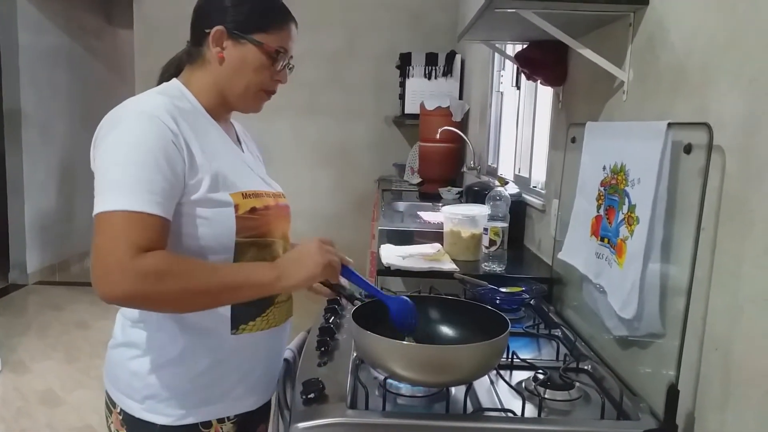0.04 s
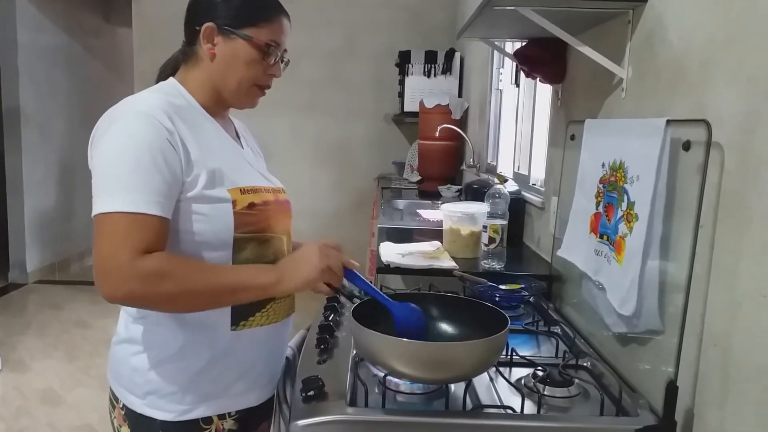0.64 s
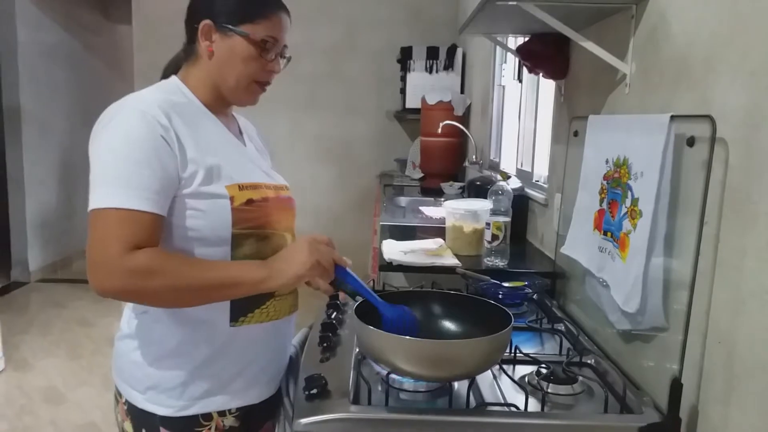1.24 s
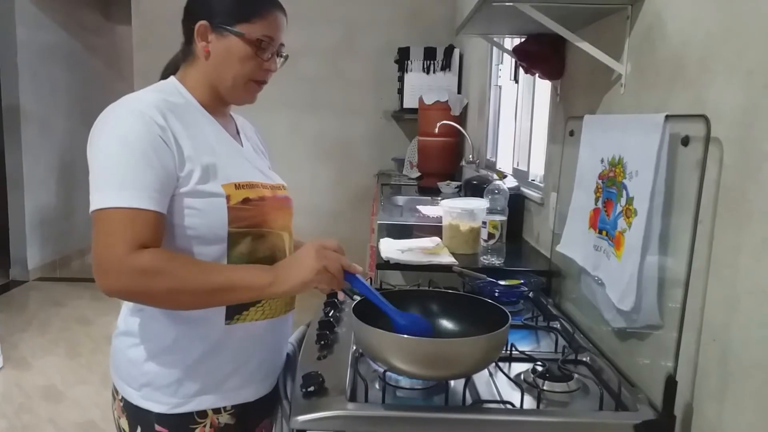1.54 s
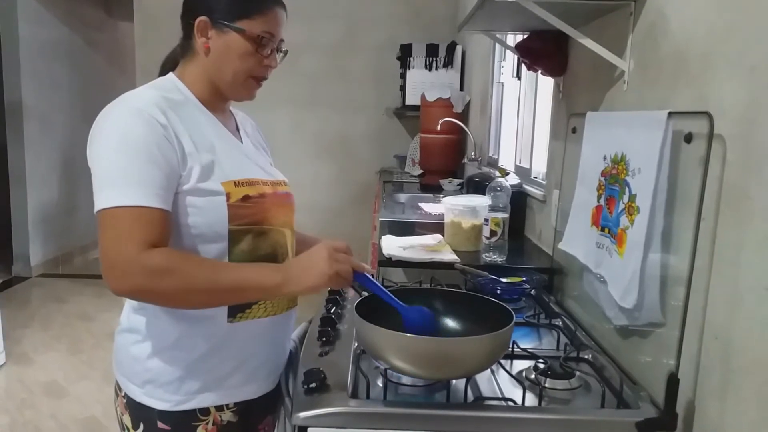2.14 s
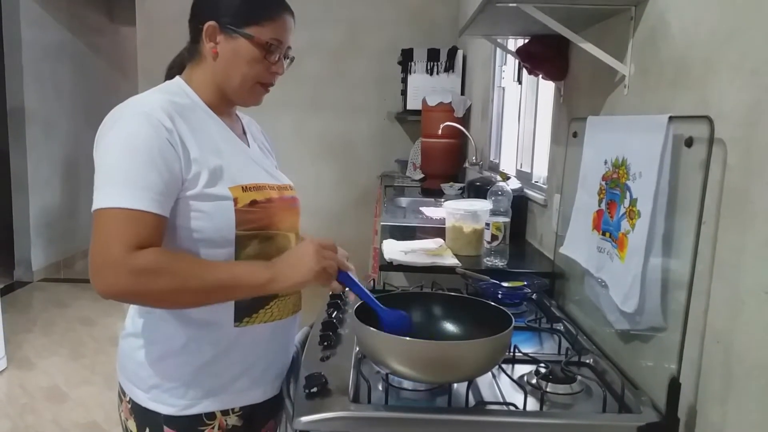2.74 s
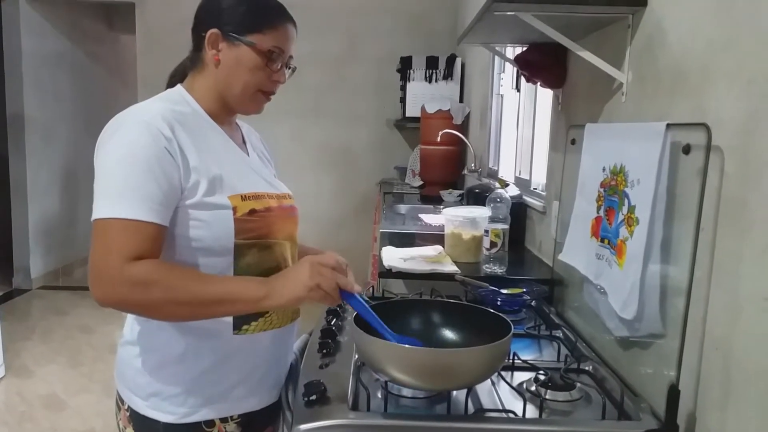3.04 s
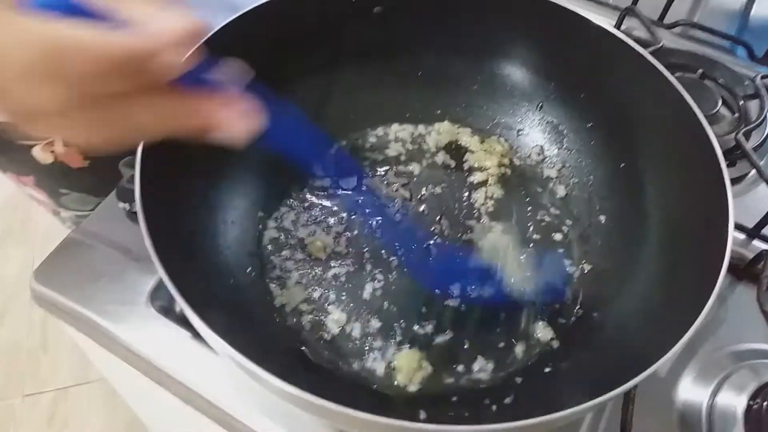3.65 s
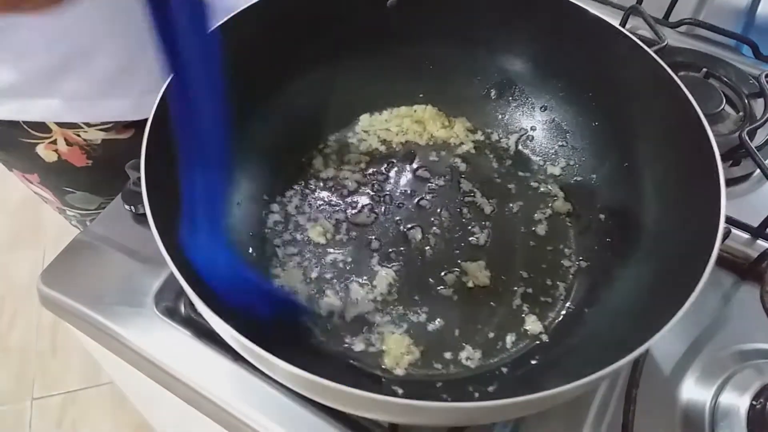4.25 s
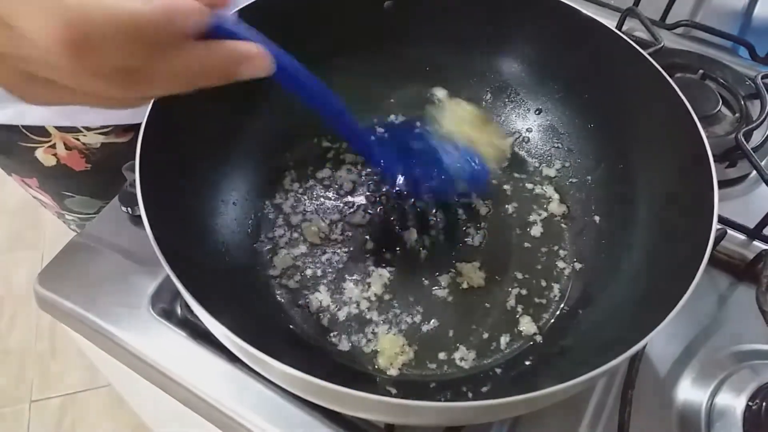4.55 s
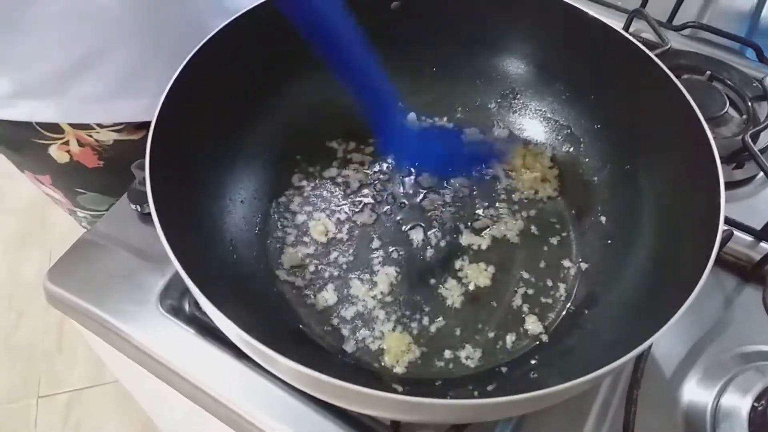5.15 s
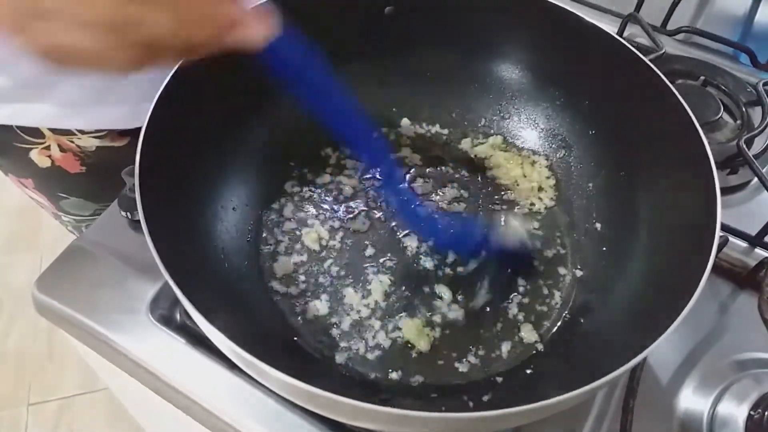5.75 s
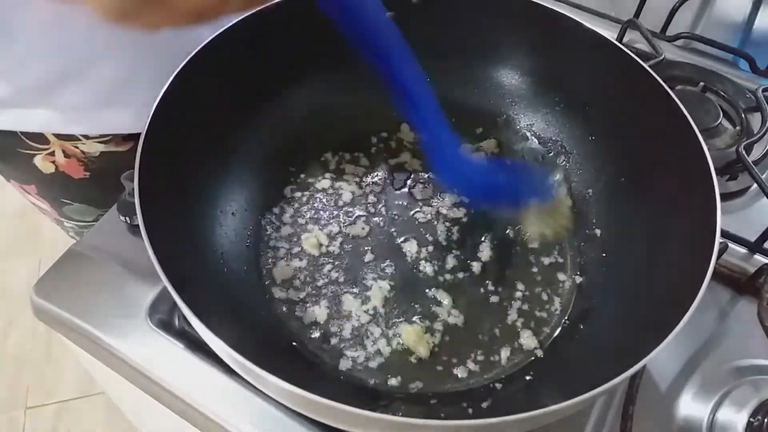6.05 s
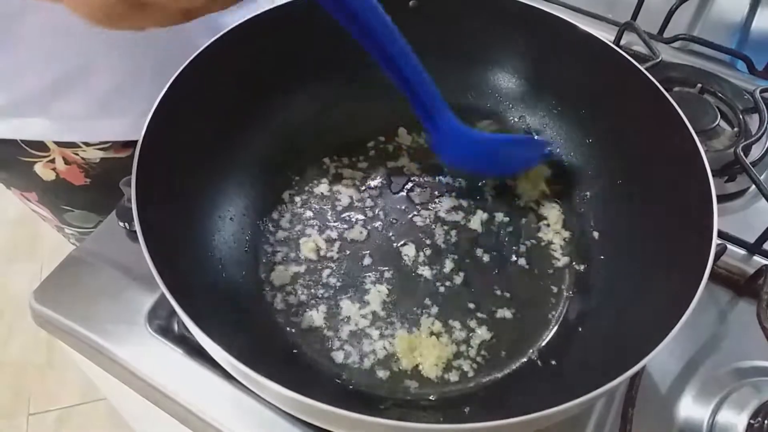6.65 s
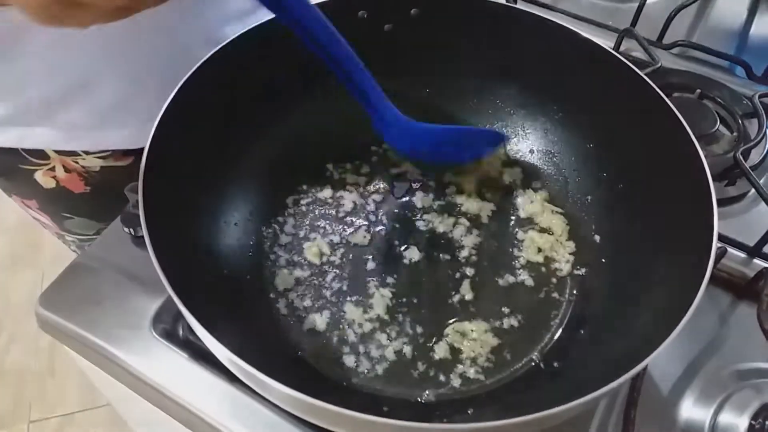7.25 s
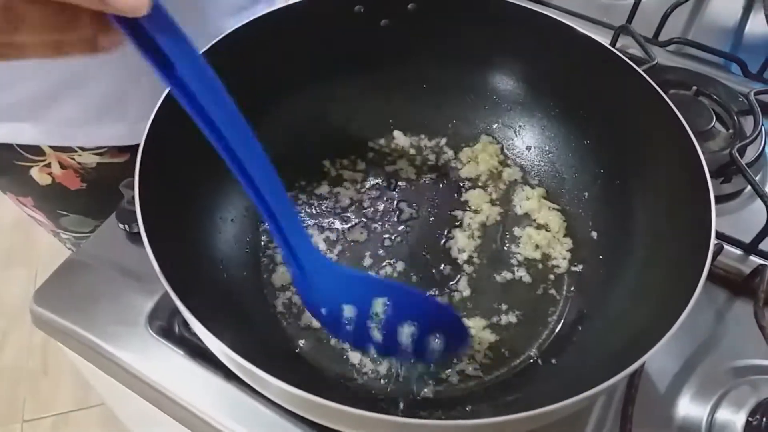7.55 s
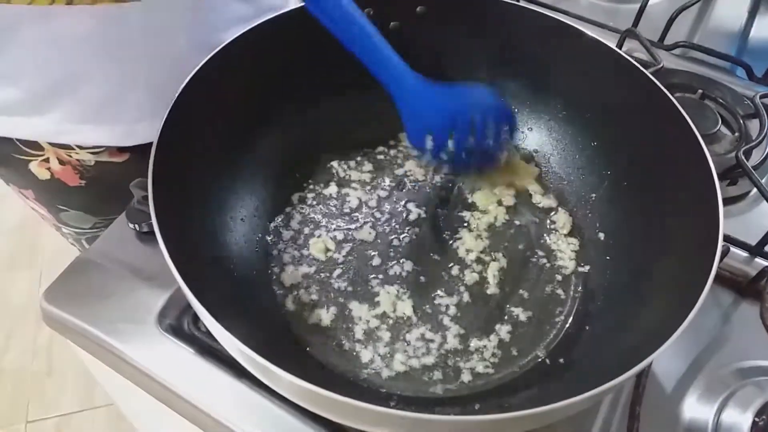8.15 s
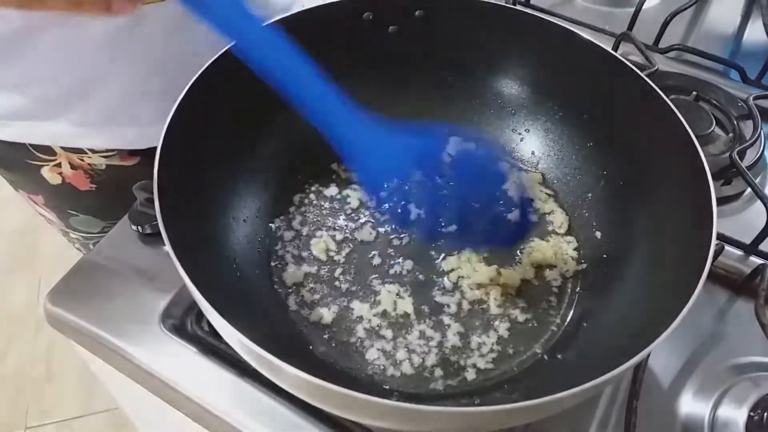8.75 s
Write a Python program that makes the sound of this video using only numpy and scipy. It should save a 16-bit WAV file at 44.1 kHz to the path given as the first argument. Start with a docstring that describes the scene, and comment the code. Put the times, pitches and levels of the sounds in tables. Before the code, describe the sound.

Minced garlic sizzles in oil as a silicone spatula stirs and knocks the pan, faint at first, then close and loud.

```python
"""In a tiled kitchen, minced garlic fries in a wok on a gas stove while a silicone spatula stirs it.
Countless steam bubbles burst in the oil; the burner rumbles and a fridge hums underneath.
Each landing of the blade thuds, drags and clacks the pan on its grate; each sweep rubs and may squeak.
We listen from across the room, then, after a short break, from just above the pan. Mono."""
import sys
import numpy as np
from scipy import signal
from scipy.fft import rfft, irfft
from scipy.io import wavfile

SR = 44100
rng = np.random.default_rng(int(sys.argv[2]) if len(sys.argv) > 2 else 0)


def master(y):
    """Save y as 16-bit WAV."""
    cut = np.clip(np.atleast_2d(y).T, -1, 1)
    pcm = np.round(cut * 32767)  # scale
    wavfile.write(sys.argv[1], SR, pcm.astype(np.int16))


N = 396528
T = np.arange(N) / SR
FILTER_HZ = np.fft.rfftfreq(32768, 1 / SR)
BREAK_START_S, BREAK_END_S = 3.427, 3.4588  # far away before the break, close by after it


def undb(db):
    """Turn decibels into a number to multiply by."""
    return 10 ** (np.asarray(db) / 20)


def unit(x):
    """Scale a sound to an average strength (rms) of 1."""
    return x / np.sqrt(np.mean(x ** 2))


def waver(rate):
    """Drift by about 1 either way, toward a new random value `rate` times a second."""
    targets = rng.standard_normal(N // 8)
    return 1.2 * np.interp(T * rate, np.arange(len(targets)), targets)


def band(x, hz, q):
    """Keep the sound around one pitch; a higher q keeps a narrower band."""
    angle = 2 * np.pi * min(hz, SR / 2 - 1000) / SR
    damping = np.sin(angle) / (2 * q)
    return signal.lfilter([damping, 0, -damping], [1 + damping, -2 * np.cos(angle), 1 - damping], x)


def shape_tone(x, gain):
    """Filter a sound with one gain for each of FILTER_HZ."""
    cepstrum = irfft(np.log(gain))
    half = len(cepstrum) // 2
    # folding it in half makes the filter ring only after a sound, never before
    cepstrum[1:half] *= 2
    cepstrum[half + 1:] = 0
    response = irfft(np.exp(rfft(cepstrum)))[:half]
    return signal.oaconvolve(x, response)[:len(x)]


def colour(x, points):
    """Turn lows and highs up or down along (pitch [Hz], level [dB]) points."""
    hz, db = np.transpose(points)
    return shape_tone(x, undb(np.interp(np.log(FILTER_HZ + 1), np.log(hz), db)))


def add(out, time, x):
    """Mix x in, starting at a time in seconds."""
    start = max(int(time * SR), 0)
    out[start:start + len(x)] += x[:len(out) - start]


def clicks(rate, spread_db):
    """About `rate` random clicks a second: many small, a few large."""
    size = undb(spread_db * np.minimum(rng.standard_normal(N), 2.6))
    return unit((rng.random(N) < rate / SR) * size * rng.choice([-1, 1], N))


def swell(peak, rise, fall):
    """A smooth rise and fall, timed in seconds: gives the samples it covers and its height there."""
    part = slice(max(int((peak - 3.5 * rise) * SR), 0), int((peak + 3.5 * fall) * SR))
    t = T[part] - peak
    return part, np.exp(-(t / np.where(t < 0, rise, fall)) ** 2 / 2)


# tone of the burner: (pitch [Hz], relative level [dB])
BURNER_TONE = [(25, -41), (45, -8), (80, -18), (125, 4), (220, -7.5), (400, -3), (800, -12), (1500, -33),
               (4000, -27.5)]


def burner():
    """The gas flame makes a steady, low rushing noise."""
    return undb(-57) * unit(colour(rng.standard_normal(N), BURNER_TONE))


# tone of the rumble: (pitch [Hz], relative level [dB])
RUMBLE_TONE = [(30, -45), (70, -6), (130, -0.5), (220, 4), (320, 1.5), (450, -11), (800, -10),
               (1500, -24.5), (4000, -28)]
# moments when the rumble swells: (peak time [s], half length [s], level [dB])
RUMBLE_SWELLS = [(1.836, 0.1, -47), (2.377, 0.033, -48.5), (4.247, 0.26, -46.5), (4.332, 0.035, -36),
                 (5.053, 0.078, -50.5), (6.052, .025, -45), (6.418, 0.034, -45)]


def rumble():
    """A dull, uneven rumble that grows louder now and then."""
    power = np.full(N, undb(-54.5) ** 2)
    for time, half_length, db in RUMBLE_SWELLS:
        part, bell = swell(time, half_length, half_length)
        power[part] += (undb(db) * bell) ** 2
    flutter = undb(3.03 * waver(25))
    return np.sqrt(power) * flutter * unit(colour(rng.standard_normal(N), RUMBLE_TONE))


# notes in the fridge's hum: (multiple of the base pitch, level [dB])
FRIDGE_NOTES = [(2, -61), (3, -54.5)]


def fridge(base_hz=59.8):
    """The fridge hums two low notes that waver a little in pitch and loudness."""
    phase = 2 * np.pi * np.cumsum(base_hz * (1 + 0.00279 * waver(3.04))) / SR
    return sum(undb(db + 2.6 * waver(9)) * np.sqrt(2) * np.sin(multiple * phase)
               for multiple, db in FRIDGE_NOTES)


def bubbles(rate, fizz_db, crackle_db):
    """Steam bursts in the oil: sharp snaps, flurries of tiny ringing bubbles, hiss and lone crackles."""
    snaps, pops = clicks(rate, spread_db=4.5), clicks(1.5 * rate, spread_db=4.5)
    pitches = np.geomspace(3000, 15000, 10)
    choice = rng.integers(len(pitches), size=N)  # each pop rings at one of the pitches
    fizz = np.zeros(N)
    for k, hz in enumerate(pitches):
        flurries = undb(2.5 * waver(14))
        fizz += band(pops * (choice == k) * flurries, hz, q=4.9)
    hiss = rng.standard_normal(N)
    crackle = clicks(rate=35, spread_db=4.5)
    bursts = snaps + undb(fizz_db) * unit(fizz) + undb(-5) * hiss + undb(crackle_db) * crackle
    return unit(bursts) * undb(0.43 * waver(30))


# the sizzle flares up: (start time [s], boost [dB])
FLARES = [(3.29, 5), (3.94, 1.5), (4.27, 1.5), (4.44, 0), (5.22, 1), (8.15, 0.5)]


def frying_level(course, rise_s=0.092):
    """The frying's level in dB: it jumps as garlic is spread over hot oil, then sinks back."""
    times, course_db = np.transpose(course)
    level_db = np.interp(T, times, course_db)
    for time, boost_db in FLARES:
        if (time < BREAK_START_S) == (times[0] < BREAK_START_S):  # on the same side of the break
            age = np.maximum(T - time, 0) / rise_s
            level_db += boost_db * age * np.exp(1 - age)
    return level_db


def sizzle(bursts, course, tone, spray_db, spray_follow, spray_lag_s=0.054):
    """The bursts swell with the frying; the finest, highest spray follows a moment later."""
    fry_db = frying_level(course)
    usual_db = np.mean(np.transpose(course)[1])
    late_change_db = np.interp(T - spray_lag_s, T, fry_db) - usual_db
    fine_db = usual_db + spray_db + spray_follow * late_change_db
    sound = colour(bursts, tone)
    coarse = signal.oaconvolve(sound, signal.firwin(61, 9000, fs=SR), "same")  # below 9000 Hz
    return undb(fry_db) * unit(coarse) + undb(fine_db) * unit(sound - coarse)


# how hard the garlic fries, from across the room: (time [s], relative level [dB])
FAR_COURSE = [(0.05, -54.5), (.6, -58.5), (1.2, -53.5), (1.55, -50), (2.15, -49), (2.32, -53.5),
              (2.7, -47.5), (3.2, -50)]
# tone of the distant sizzle: (pitch [Hz], relative level [dB])
FAR_TONE = [(300, -21), (1500, -8.5), (2800, -11), (3700, -11), (4600, -0.5), (5500, 3), (6600, 4),
            (8200, 1), (9200, -14.5), (11500, -11.5), (13500, -14.5), (15800, -13.5)]


def far_frying():
    """The frying begins: fewer bubbles, mixed with their echo off the tiles."""
    bursts = bubbles(rate=3500, fizz_db=4, crackle_db=-11)
    echo = undb(-2) * kitchen_echo(bursts, low_fade_s=0.62, high_fade_s=0.6)
    return sizzle(bursts + echo, FAR_COURSE, FAR_TONE, spray_db=-2.5, spray_follow=0.58)


def kitchen_echo(x, low_fade_s, high_fade_s):
    """Sound bounces off the tiles: a few echoes, then a blur that drops 60 dB in the fade time."""
    t = T[:SR]
    echoes = rng.standard_normal(SR) * (rng.random(SR) < t / 0.03) * (t > 0.003)
    lows = signal.sosfilt(signal.butter(1, 3000, fs=SR, output="sos"), echoes)
    response = lows * undb(-60 * t / low_fade_s) + (echoes - lows) * undb(-60 * t / high_fade_s)
    return signal.oaconvolve(x, response / np.linalg.norm(response))[:N]


# the spatula lands, with levels before the pan shapes them:
# (time [s], thud level [dB], thud pitch [Hz], clack level [dB], drag level [dB])
LANDINGS = [(0.1599, 1, 1350, 4.5, -36.5), (.517, -2, 1870, -3, -33), (.829, -8, 915, -3, -59),
            (1.112, -24, 696, -11.5, -47.5), (2.480, -7.5, 650, -8, -38), (3.071, -5, 960, -12, -37),
            (3.963, -0.5, 2000, -8, -60), (4.445, -8.5, 1090, -35, -65), (4.576, -6.5, 590, -30, -47),
            (4.913, -11, 2600, -6, -49), (6.030, -10.5, 704, -30, -55), (7.058, -7.5, 550, -26, -41),
            (7.482, -9, 710, -17, -61), (7.733, -1, 695, -7, -36), (8.229, -4, 1210, -18, -58)]
# tone of metal hitting the grate: (pitch [Hz], boost [dB])
CLACK_TONE = [(100, -20), (800, 3.5), (3500, 7.5), (5000, 16.5), (6000, 12.5), (8400, 9.5), (9300, 4),
              (11000, 14), (15800, 0)]


def knocks():
    """The soft blade thuds and the pan clacks on its grate; harder clacks are brighter."""
    thuds, clacks, t = np.zeros(N), np.zeros(N), T[:SR // 20]
    for time, thud_db, thud_hz, clack_db, _ in LANDINGS:
        noise = rng.standard_normal(len(t))
        judder = 0.16 * noise[::-1] * np.exp(-t / 0.018)  # the rubber shakes after landing
        thud = band(ring(thud_hz, 2 * thud_hz, t) + judder, thud_hz, q=0.49)
        add(thuds, time, undb(thud_db) * thud / np.linalg.norm(thud))
        chatter = noise * np.exp(-t / 0.0062)
        top_hz = min(6300 * 2 ** (clack_db / 24), SR / 3)
        soften = signal.butter(2, top_hz, fs=SR, output="sos")
        add(clacks, time, undb(clack_db) * signal.sosfilt(soften, chatter / np.linalg.norm(chatter)))
    return thuds + colour(clacks, CLACK_TONE)


def drags(slips, rise_s=0.0054, fall_s=0.058):
    """Just after each landing, the blade drags with a dull rub."""
    return sum(rub(slips, time + 2 * rise_s, rise_s, fall_s, db, hz=572, q=0.73)
               for time, *_, db in LANDINGS)


def ring(hz, width_hz, t):
    """A fading note; the greater its width, the sooner it dies."""
    return np.exp(-np.pi * width_hz * t) * np.sin(2 * np.pi * hz * t)


def rub(slips, peak, rise, fall, db, hz, q=0.58):
    """Silicone sticks and slips over the garlic: tiny clicks blur into one swell of noise."""
    out = np.zeros(N)
    part, pressure = swell(peak, rise, fall)
    out[part] = undb(db) * pressure * unit(band(band(slips[part], hz, q), hz, q))
    return out


# the pan's own notes, damped by oil and spatula: (pitch [Hz], width [Hz], boost [dB])
PAN_NOTES = [(208, 36, 2.5), (422, 3.3, 8.5), (520, 9.9, -6.5), (613.6, 17, 2), (695.3, 20, 3.5),
             (860, 16, -5), (1046, 13, 9.5), (1121, 8.6, 8.5), (1399, 9.4, 1.5), (1387, 17, 3.5),
             (1580, 22, 1.5), (1810, 33, -17), (1906, 20, 2.5), (2106, 61, 0.5), (2330, 44, -9),
             (2420, 60, -18.5), (2690, 98, 0.5), (3414, 104, 1.5), (4730, 290, -3), (5070, 70, 7),
             (5420, 79, 4.5), (6000, 87, 3), (6420, 57, 8), (6790, 60, 10), (7930, 48, 12)]


def pan(force):
    """The metal bowl rings at its own notes and passes other pitches only weakly."""
    power = sum(undb(2 * db) / (1 + (2 * (FILTER_HZ - hz) / width) ** 2) for hz, width, db in PAN_NOTES)
    return shape_tone(force, np.sqrt(power + undb(-7) ** 2))


# the spatula sweeps across, with levels before the pan shapes them:
# (peak time [s], rise time [s], level [dB], pitch [Hz], squeak compared with the rub [dB])
SWEEPS = [(0.254, .035, -42, 1560, 3), (.61, 0.038, -36, 1665, -13), (.848, 0.022, -41.5, 770, 11),
          (.877, 0.016, -28.5, 1990, -16), (1.18, 0.028, -40, 1200, -23), (2.54, 0.026, -35.5, 1400, -15),
          (2.797, 0.013, -51.5, 807, 14), (2.849, 0.021, -38, 1100, -14), (3.13, 0.029, -38.5, 1440, 1),
          (3.935, 0.026, -37.5, 1400, -20), (4.29, .08, -46, 730, -20), (4.49, 0.044, -35, 1670, -22),
          (4.917, 0.016, -34.5, 2400, 2), (4.97, 0.017, -49, 727, 5.5), (5.754, 0.024, -26.5, 1950, -1),
          (5.775, 0.026, -42, 1420, 9.5), (6.485, 0.035, -32, 1816, -2), (7.106, 0.016, -32, 1290, 3),
          (7.44, 0.023, -29, 1940, -12), (7.83, 0.023, -40, 1110, -2.5)]


def sweeps(slips):
    """Each sweep starts as a slow, dull rub, then grows louder and brighter."""
    out = np.zeros(N)
    for time, rise, db, hz, _ in SWEEPS:
        run_up = rub(slips, time - 2.23 * rise, 0.65 * rise, 1.44 * rise, db - 16, 0.41 * hz)
        out += run_up + rub(slips, time, rise, 0.77 * rise, db, hz)
    return out


def squeaks():
    """At a sweep's peak the sticking and slipping turns regular: a short note with a weak octave."""
    out, bend_octaves = np.zeros(N), 0.0657 * waver(250)
    for time, rise, db, hz, squeak_db in SWEEPS:
        part, grip = swell(time, 0.55 * rise, 0.55 * rise)
        phase = 2 * np.pi * np.cumsum(hz * 2 ** bend_octaves[part]) / SR
        note = np.sin(phase) + undb(-10) * np.sin(2 * phase)
        out[part] += undb(db + squeak_db) * grip * np.sqrt(2) * note
    return out


# how hard the garlic fries, from just above the pan: (time [s], relative level [dB])
NEAR_COURSE = [(3.65, -25), (4.58, -23.5), (7.89, -26), (8.27, -24.5), (8.95, -24.5)]
# tone of the close sizzle: (pitch [Hz], relative level [dB])
NEAR_TONE = [(290, -68), (500, -28), (561, -27.5), (718, -21), (891, -23.5), (1110, -17), (1480, -19.5),
             (2560, -13.5), (2830, -16), (4060, -7), (6450, -0.5), (8010, 0.5), (9120, -7), (14900, -5),
             (15800, -9.5)]


def near_frying():
    """A full sizzle: crowds of bubbles, close by and without echo."""
    bursts = bubbles(rate=7500, fizz_db=-2, crackle_db=-14.5)
    return sizzle(bursts, NEAR_COURSE, NEAR_TONE, spray_db=1.17, spray_follow=1.22)


# garlic shoved onto hotter oil spits: (time [s], level [dB])
OIL_SPITS = [(3.938, -7), (4.527, -17), (5.106, -22), (5.305, -21), (5.337, -16), (8.484, -11)]


def spits():
    """Single larger drops burst, each with a tiny, high ping."""
    out = np.zeros(N)
    for time, db in OIL_SPITS:
        hz = 7000 * 2 ** (rng.standard_normal() / 4)
        add(out, time, undb(db) * ring(hz, width_hz=700, t=T[:400]))
    return out


# the blade's edge flicks free: (time [s], pitch [Hz], level before the pan shapes it [dB])
EDGE_FLICKS = [(4.914, 4100, -21), (5.745, 4400, -26), (5.775, 4400, -21.5), (7.441, 3080, -32.5)]


def flicks(half_length_s=0.0075):
    """The edge shakes fast as it lets go, making a bright chirp."""
    judder = rng.standard_normal(N)
    return sum(rub(judder, time, half_length_s, half_length_s, db, hz, q=2.5)
               for time, hz, db in EDGE_FLICKS)


def scene():
    """The same pan from two places: far and echoing at first, then close and at a full sizzle."""
    pushes = knocks()
    slips = clicks(rate=3500, spread_db=2.5) * undb(4.35 * waver(90))
    stirring = pan(pushes + drags(slips) + sweeps(slips) + squeaks() + flicks())
    stir_echo = kitchen_echo(stirring, low_fade_s=0.61, high_fade_s=0.49)
    far = undb(3) * far_frying() + stirring + undb(-2) * stir_echo
    near = undb(-0.23) * near_frying() + spits() + undb(2) * stirring + undb(-11) * stir_echo
    mono = np.where(T < BREAK_START_S, far, near) + burner() + rumble() + fridge()
    return np.array([mono, mono])


def record(dry):
    """All goes silent for a moment between the two places, and the very highest treble is cut."""
    audible = (T < BREAK_START_S) | (T > BREAK_END_S)
    treble_cut = signal.ellip(12, 0.1, 80, 15850, fs=SR, output="sos")
    return signal.sosfilt(treble_cut, dry * audible)


dry = scene()
out = record(dry)
master(out)
```